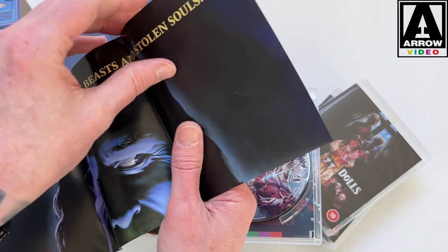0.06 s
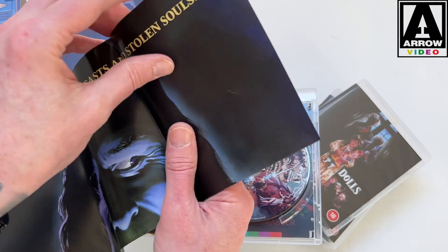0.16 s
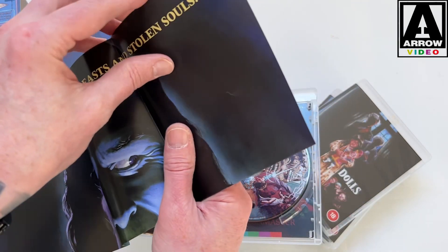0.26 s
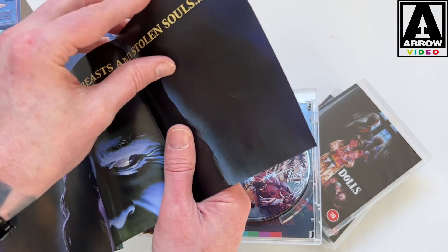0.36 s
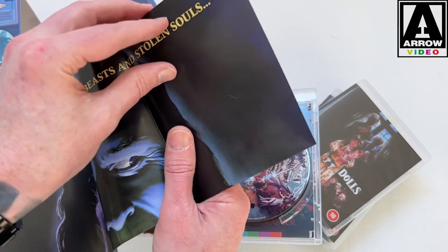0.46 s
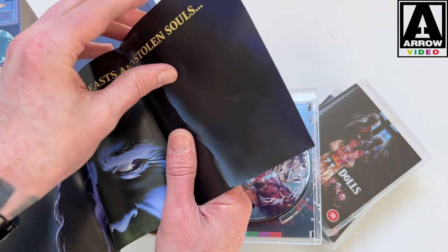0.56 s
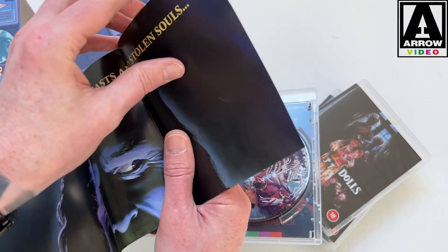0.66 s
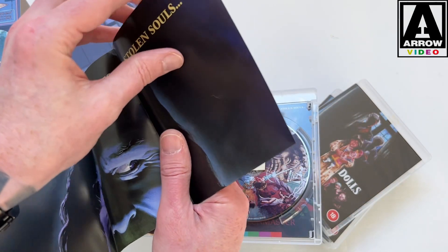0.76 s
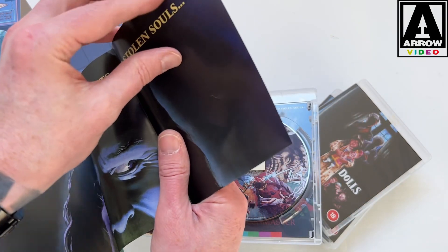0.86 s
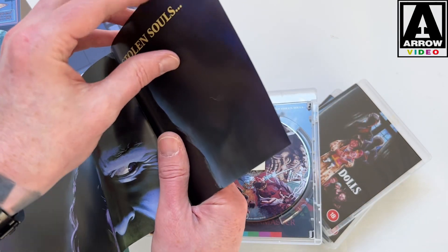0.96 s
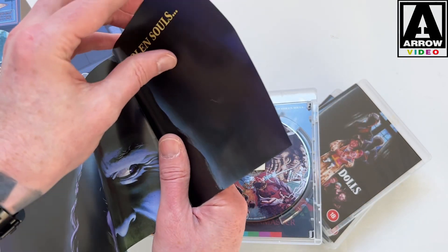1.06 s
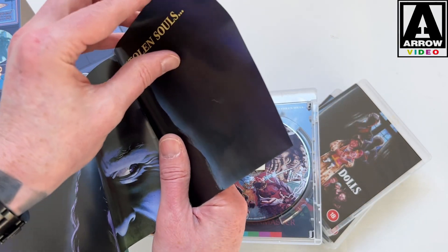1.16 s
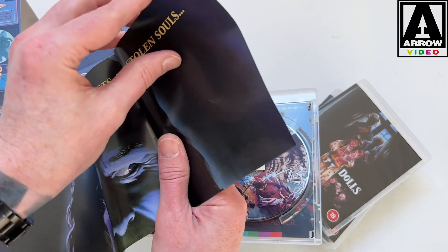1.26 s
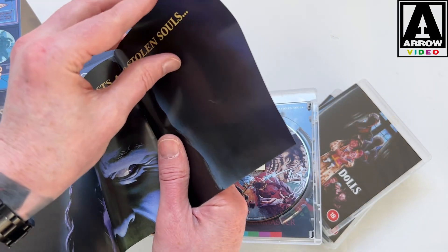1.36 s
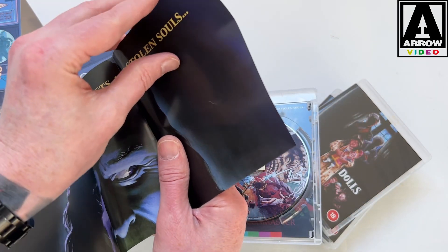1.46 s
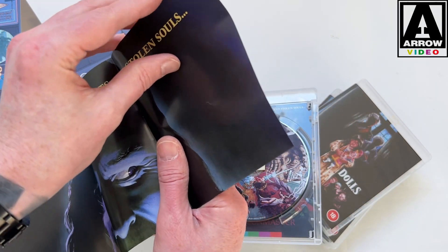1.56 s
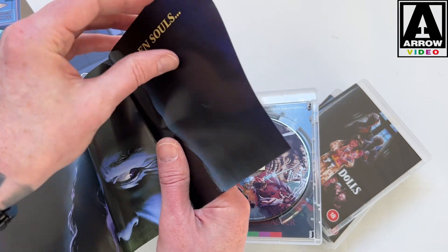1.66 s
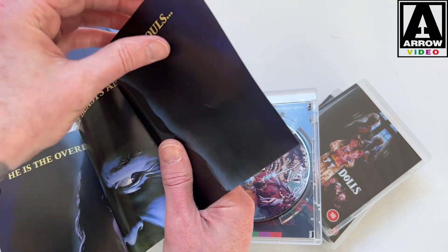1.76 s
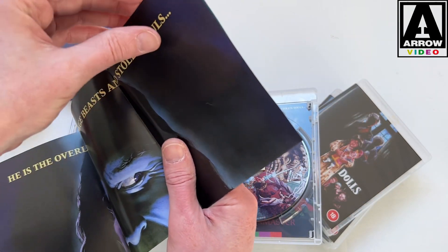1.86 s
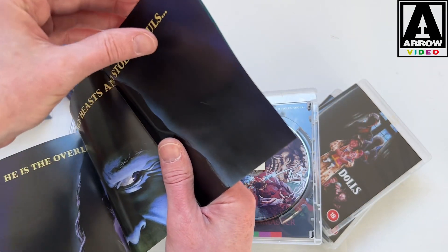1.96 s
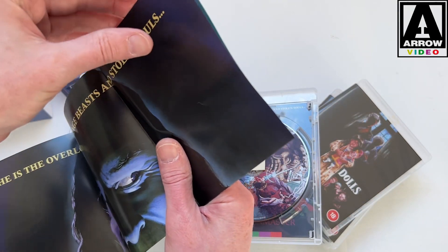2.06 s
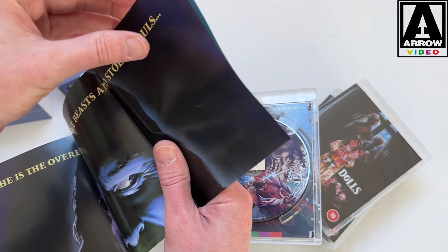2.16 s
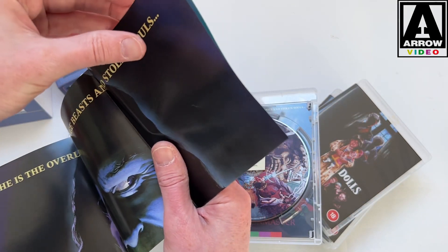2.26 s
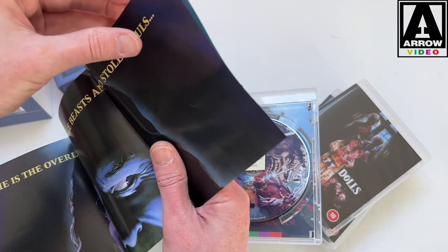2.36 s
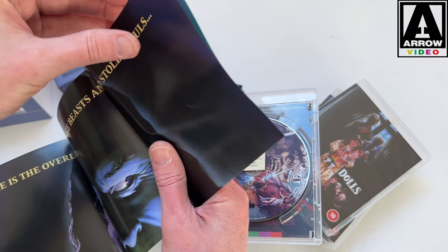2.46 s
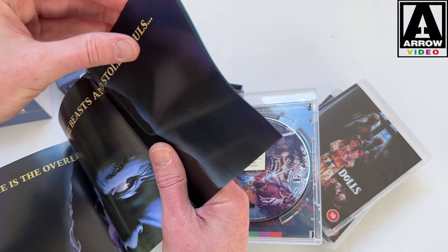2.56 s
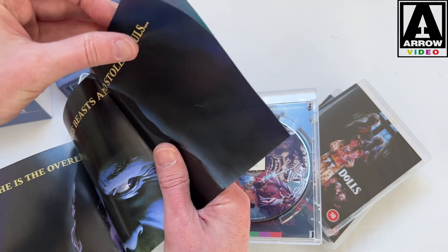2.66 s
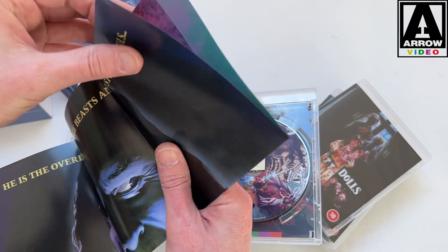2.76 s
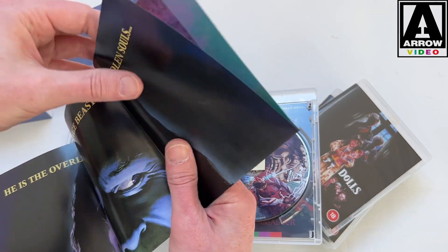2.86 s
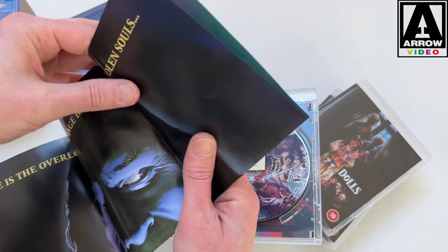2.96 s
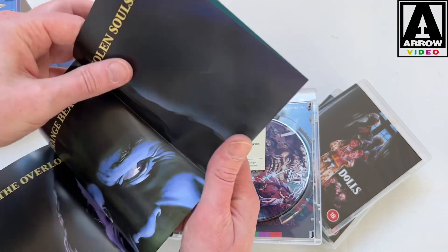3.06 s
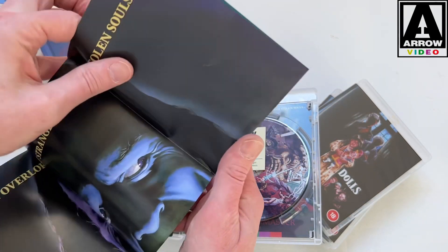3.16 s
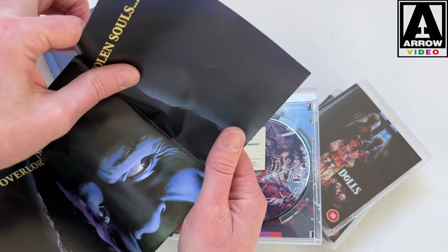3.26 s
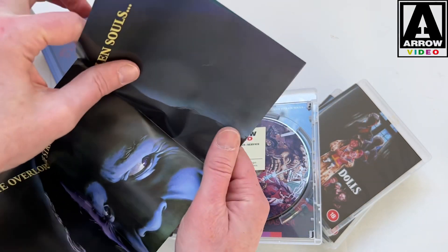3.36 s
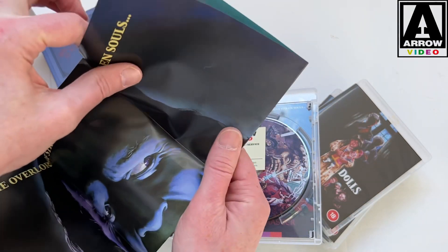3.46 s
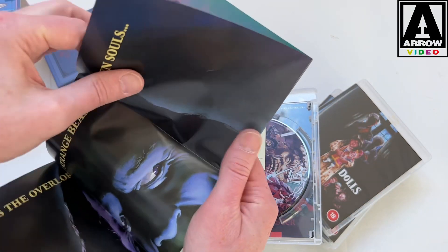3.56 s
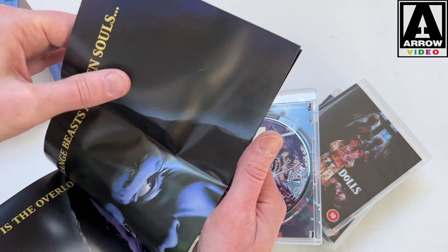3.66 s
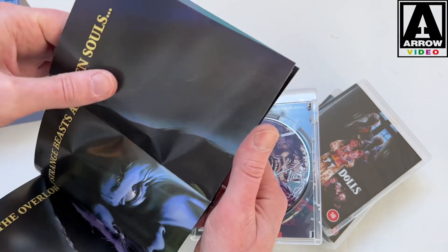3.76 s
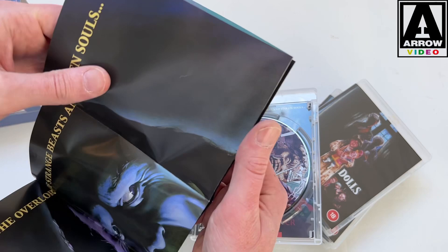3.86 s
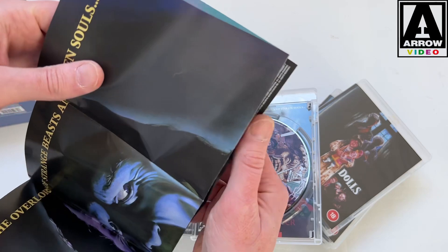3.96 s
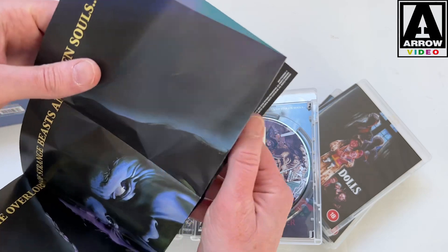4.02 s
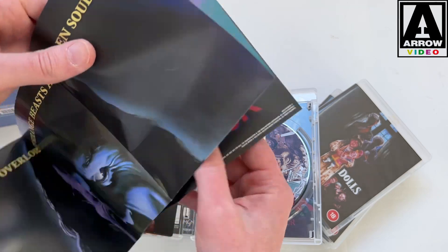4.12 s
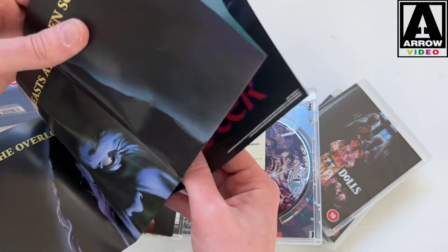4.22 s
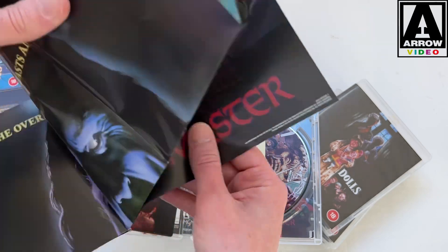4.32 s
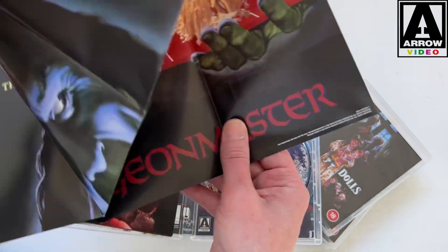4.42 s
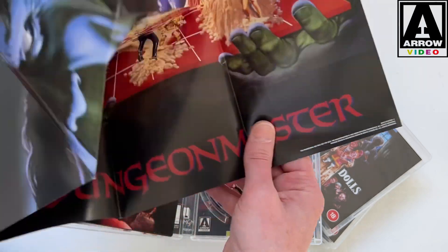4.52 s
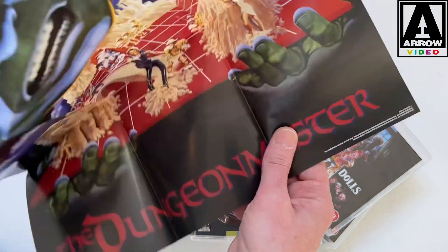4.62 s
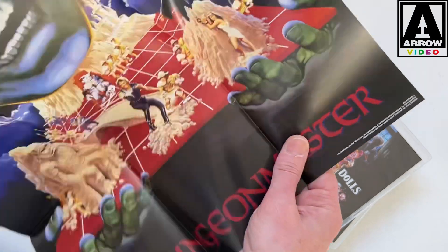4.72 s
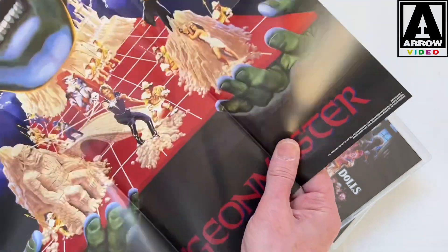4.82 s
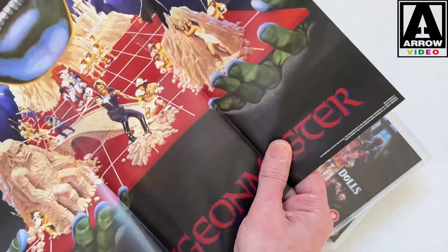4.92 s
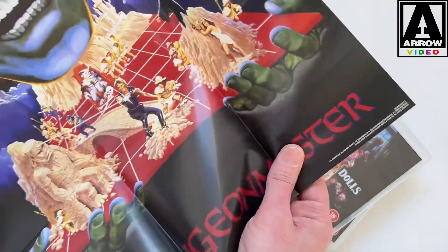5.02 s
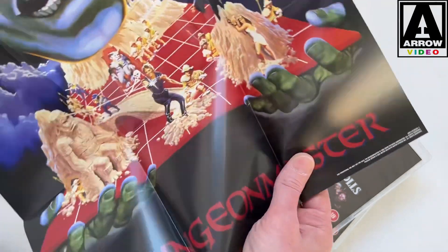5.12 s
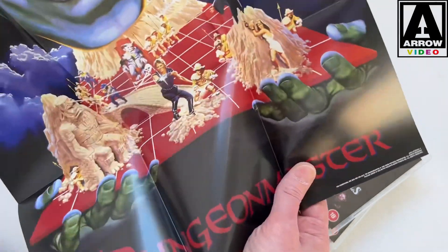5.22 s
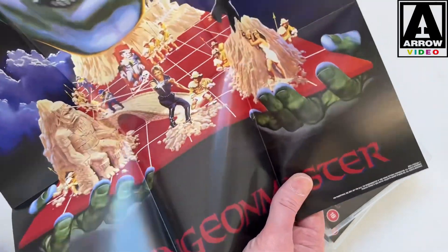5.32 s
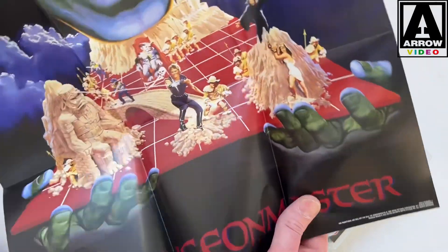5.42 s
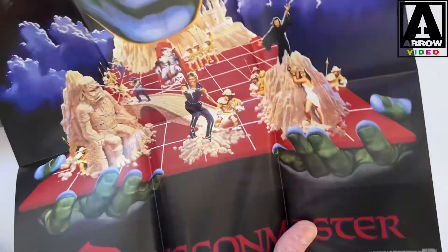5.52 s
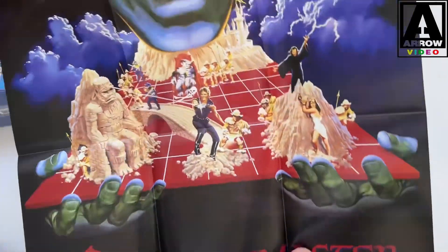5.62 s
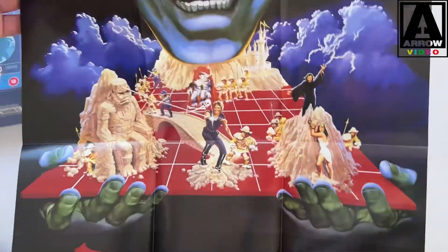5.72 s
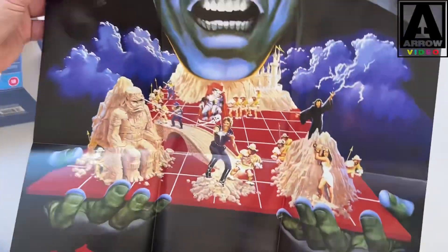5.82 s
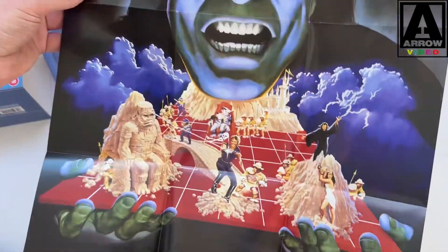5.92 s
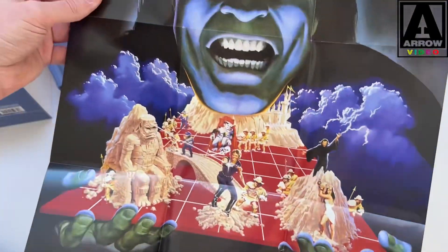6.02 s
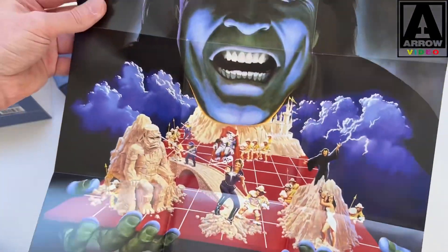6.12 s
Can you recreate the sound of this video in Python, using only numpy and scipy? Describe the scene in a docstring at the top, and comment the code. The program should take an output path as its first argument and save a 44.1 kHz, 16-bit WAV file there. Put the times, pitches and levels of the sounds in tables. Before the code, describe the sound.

Hands unfold a stiff, glossy paper poster close to the microphone in a small, quiet room. Light finger hiss, small crinkles and a few ticks come first, then almost nothing for a moment. Rustling returns and builds to a very sharp burst of snapping creases, followed by dense, loud crackling with low papery wobble and hollow flaps, easing at the end.

```python
"""Unfolding a stiff glossy poster

Hands unfold a poster over a table, close to a two-port microphone. Fingers hiss on the coating (shaped
noise), panels crinkle and the sheet wobbles (resonators driven by noise and small dents), creases snap
(swept damped tones with a thump) and the coating cracks (clicks with short tones). A small room answers
with decaying noise and hums underneath."""
import sys
import numpy as np
from scipy import signal
from scipy.fft import rfft, irfft, next_fast_len
from scipy.io import wavfile
from scipy.ndimage import uniform_filter1d, map_coordinates

SR = 44100
rng = np.random.default_rng(int(sys.argv[2]) if len(sys.argv) > 2 else 0)


def wav_out(sig):
    """Save sig, one row per channel (or a flat mono array), as 16-bit PCM at SR to the path in sys.argv[1]."""
    wavfile.write(sys.argv[1], SR, np.round(np.clip(np.atleast_2d(sig).T, -1, 1) * 32767).astype(np.int16))


N = 272758  # samples


def amp(db):
    """Decibel law: amplitude gain of a level in dB."""
    return 10 ** (np.asarray(db) / 20)


def unit(x):
    """Power normalisation: x at rms 1."""
    return x / np.sqrt(np.mean(x ** 2) + 1e-20)


def along(points, hz):
    """Interpolation of (frequency [Hz], value) points on a logarithmic frequency axis."""
    f, v = np.transpose(points)
    return np.interp(np.log(hz + 1), np.log(f + 1), v)


def curves(rows):
    """Linear interpolation in time: one value per sample for each column after the time."""
    s, *columns = np.transpose(rows)
    return [np.interp(np.arange(N) / SR, s, column) for column in columns]


def wobble(rate):
    """Band-limited random modulation: a smooth curve through `rate` random knots a second."""
    knots = rng.standard_normal(int(N * rate / SR) + 4)
    return map_coordinates(knots, [np.arange(N) * rate / SR])


def filtered(x, response):
    """Linear filtering: the spectrum of x times a complex response of frequency."""
    m = next_fast_len(x.shape[-1] + 8192)  # padding limits wrap-around
    spectrum = rfft(x, m) * response(np.fft.rfftfreq(m, 1 / SR))
    return irfft(spectrum, m)[..., :x.shape[-1]]


def modes(table):
    """Modal superposition: causal response of (centre [Hz], width [Hz], level [dB]) resonances."""
    def response(f):
        total = 0
        for k, (centre, width, db) in enumerate(table):
            damping = 1j * f * width
            total = total + (-1) ** k * amp(db) * damping / (centre ** 2 - f ** 2 + damping)
        return total
    return response


def blurred(x, tail, step):
    """Time-varying convolution: x meets a freshly drawn unit-energy tail every `step` samples."""
    out = np.zeros(N + SR)
    for i in range(0, N, step):
        h = tail()
        answer = signal.fftconvolve(x[i:i + step], h / np.linalg.norm(h))
        out[i:][:len(answer)] += answer
    return out[:N]


# Spectrum of the room's steady air noise: (frequency [Hz], relative density [dB])
AIR_SPECTRUM = [(15, -42), (25, -18), (53, 1), (81, -15.5), (240, -13.5), (366, -21.5), (622, -22),
                (665, -18), (1130, -13), (1210, -16), (2690, -42.5), (5000, -48), (6500, -69),
                (11000, -120)]
AIR_DB = -61.5  # mean level


def hum():
    """Stationary background noise: shaped Gaussian noise whose level drifts a little."""
    air = unit(filtered(rng.standard_normal(N), lambda hz: amp(along(AIR_SPECTRUM, hz))))
    return amp(AIR_DB + 0.38 * wobble(3.0)) * air


def grit(per_s, spread_db, smooth):
    """Asperity contact: random ticks of very uneven size over a share of smooth noise, rms 1."""
    sizes = rng.standard_normal(N) * amp(spread_db * rng.exponential(size=N))
    ticks = (rng.random(N) < per_s / SR) * sizes
    return unit(unit(ticks) + abs(smooth) * rng.standard_normal(N))


def patchy(x, depth_db):
    """Local radiation: random patches of gain over time and frequency, rms 1."""
    z = signal.stft(x, nperseg=256)[2]
    field = uniform_filter1d(rng.standard_normal(z.shape), size=6, axis=0)
    field = uniform_filter1d(field, size=10, axis=1)
    return unit(signal.istft(z * amp(depth_db * unit(field)), nperseg=256)[1][:N])


def buckles(per_s, pitch_hz, cycles, spread_db):
    """Small-scale buckling: many dents, each a damped tone of its own pitch and size, rms 1."""
    place, pitch, size, sign = rng.random((int(per_s * N / SR), 4)).T[:, :, None]
    hz = pitch_hz * np.exp(2.03 * (pitch - .5))
    k = np.arange(400)  # samples in a dent
    turns = hz * k / SR
    level = -60 * turns / (3 * cycles) - spread_db * np.log(size + 0.021)
    dent = np.sin(2 * np.pi * turns) * amp(level) * np.sign(sign - .5)
    where = (place * N).astype(int) + k
    return unit(np.bincount(where.ravel(), dent.ravel(), N + len(k))[:N])


def swells(s, db, hold, rise, fall):
    """Gesture envelope: dB-linear rise [dB/s] up to s, held until s + hold, then dB-linear fall; powers add."""
    t = np.arange(0, N, 32)[:, None] / SR  # a coarse grid, interpolated below
    before = (s - t) * abs(rise)
    after = (t - s - abs(hold)) * abs(fall)
    level = db - np.maximum(np.maximum(before, after), 0)
    return np.interp(np.arange(N) / SR, t[:, 0], np.sqrt(np.sum(amp(level) ** 2, axis=1)))


# Steady handling, base levels: (time [s], finger hiss [dB], crinkle [dB], flexing [dB], hollow boom [dB])
HANDLING_LEVELS = [(0, -57, -51, -63, -64), (.15, -62, -55.5, -64, -68), (.225, -69, -61.5, -65, -70),
                   (.28, -59.5, -53, -63, -68), (.5, -60, -58, -64.5, -67), (.7, -55, -48.5, -57, -72),
                   (.8, -58, -54, -58, -66), (.95, -57.5, -62, -61, -62), (1.09, -71, -67, -60, -67),
                   (1.2, -62, -58, -61, -68), (1.35, -65, -60.5, -64, -71), (1.44, -54, -57.5, -65, -72),
                   (1.49, -73, -71, -78, -79), (1.77, -57, -58, -63, -70), (1.87, -79, -79, -72, -70),
                   (2.37, -83, -74.5, -65.5, -70), (2.53, -83, -92, -74, -72), (2.6, -61, -66, -64, -71),
                   (2.76, -55, -59, -58, -64), (2.9, -45, -48.5, -56, -58), (3.04, -50, -51.5, -57, -55),
                   (3.15, -54.5, -54, -55, -52), (3.25, -65, -56, -56, -58), (3.33, -49, -54, -59.5, -61),
                   (3.44, -57.5, -63, -62.5, -67), (3.58, -48.5, -44, -48, -48),
                   (3.72, -44.5, -41.5, -50, -53), (3.84, -53.5, -49.5, -55, -51.5),
                   (4, -52, -47.5, -58, -55), (4.12, -47, -45, -50, -50.5),
                   (4.25, -43.5, -35.5, -42, -38.5), (4.43, -48, -44, -43.5, -49.5),
                   (4.64, -47, -45, -47, -46), (4.92, -52, -42, -46, -45), (5.12, -45, -41.5, -49, -46.5),
                   (5.2, -47.5, -48, -52, -38), (5.31, -58, -46, -54, -41), (5.4, -48, -30.5, -39, -33),
                   (5.5, -45.5, -38, -47.5, -34.5), (5.57, -46, -44, -50, -46),
                   (5.65, -46.5, -49.5, -52, -53.5), (5.8, -49.5, -48, -52, -51),
                   (5.98, -58, -51.5, -60, -51.5), (6.1, -52, -50.5, -47, -55),
                   (6.18, -54.5, -55, -51, -58)]
# Tugs that make the sheet lurch: (time [s], crinkle level [dB], body level [dB], hold [s])
SHEET_TUGS = [(0.046, -49, -58, 0.013), (0.371, -43, -60, 0.014), (0.834, -48, -51.5, .01),
              (1.128, -54.5, -62, 0.024), (1.22, -56, -56, 0.026), (1.684, -48, -53, 0.023),
              (2.554, -59.5, -67, 0.013), (2.674, -48, -62, 0.021), (2.827, -43, -42, .005),
              (2.942, -38.5, -48.5, .012), (2.974, -38, -46.5, 0.017), (3.134, -44, -50, 0.017),
              (3.216, -59, -48, .005), (3.627, -27.5, -31, 0.021), (3.662, -37, -46, 0.019),
              (3.871, -47.5, -52, .01), (3.895, -40.5, -45.5, .005), (3.937, -42, -59, .01),
              (3.968, -37.5, -58, 0.0071), (4.162, -31, -50, 0.012), (4.376, -36, -37.5, 0.011),
              (4.537, -44, -48, .01), (4.562, -42.5, -46, 0.0065), (4.605, -38, -47, 0.017),
              (4.667, -31, -33, .02), (4.792, -26, -31, 0.024), (4.841, -35.5, -34, 0.012),
              (5.006, -35, -44.5, 0.036), (5.099, -37, -41, .008), (5.27, -39.5, -48, .01),
              (5.336, -31.5, -33, 0.016), (5.599, -45, -55, .015), (5.835, -42.5, -46, .008),
              (5.928, -41, -56, .01), (6.042, -42.5, -40.5, 0.023), (6.091, -50, -42, .01)]
TUG_RISE, TUG_FALL = 1300, 424  # dB/s
# Finger strokes on the coating: (time [s], level [dB], hold [s], rise [dB/s])
FINGER_STROKES = [(0.036, -47, 0.022, 298), (0.123, -56.5, .07, 300), (0.253, -54.5, .01, 1200),
                  (0.382, -50.5, .03, 600), (.585, -49, 0.21, 250), (0.833, -41, .008, 800),
                  (1.133, -49.5, 0.024, 700), (1.3, -54, .01, 300), (1.367, -47.5, .015, 1200),
                  (1.413, -49.5, 0.019, 400), (1.66, -61, .01, 400), (1.701, -42, 0.0082, 500),
                  (2.03, -72, .01, 400), (2.145, -77, .01, 400), (2.302, -71, .005, 1500),
                  (2.553, -48.5, .005, 2500), (2.567, -46, 0.0034, 604), (2.686, -40, 0.011, 400),
                  (2.8, -44, .01, 900), (2.829, -36, .008, 400), (2.87, -39.5, 0.058, 400),
                  (2.95, -44.5, 0.049, 400), (3.197, -48.5, 0.018, 200), (3.278, -45.5, 0.024, 700),
                  (3.33, -42, 0.0091, 300), (3.471, -51, .01, 600), (3.507, -45.5, 0.012, 300),
                  (3.644, -40.5, 0.026, 600), (3.868, -45, .01, 600), (3.891, -37.5, 0.0071, 400),
                  (3.958, -42.5, 0.016, 500), (4.059, -39.5, .01, 300), (4.148, -42, 0.15, 1500),
                  (4.332, -38.5, 0.056, 900), (4.475, -36, 0.023, 500), (4.675, -46, 0.017, 900),
                  (4.793, -35.5, 0.033, 2000), (4.956, -41, 0.049, 700), (5.003, -34, 0.032, 600),
                  (5.102, -35.5, .01, 300), (5.227, -41.5, 0.009, 300), (5.339, -42.5, .11, 1500),
                  (5.995, -45.5, .02, 2500), (6.035, -44.5, .035, 600)]
STROKE_FALL = 350  # dB/s
BOOM_DB, FAN_DB = -2, -8  # boom and fanned air of a tug, relative to its body
DRAUGHT_DB, STIR_DB = -5, -67.5  # fanned air relative to flexing; base level of air always stirring


def efforts():
    """Energetic summation: steady handling plus strokes and tugs drive five kinds of sound."""
    hiss, crinkle, flex, boom = amp(curves(HANDLING_LEVELS))
    s, crinkle_db, body_db, hold = np.transpose(SHEET_TUGS)
    tug_body = swells(s, body_db, hold, TUG_RISE, TUG_FALL)
    tug_crinkle = swells(s, crinkle_db, hold, TUG_RISE, TUG_FALL)
    strokes = swells(*np.transpose(FINGER_STROKES), STROKE_FALL)
    fanned = np.hypot(amp(DRAUGHT_DB) * flex, amp(FAN_DB) * tug_body)
    return (np.hypot(hiss, strokes),
            np.hypot(crinkle, tug_crinkle),
            np.hypot(flex, tug_body),
            np.hypot(boom, amp(BOOM_DB) * tug_body),
            amp(STIR_DB) + fanned)


# Friction spectrum of the coating: (frequency [Hz], relative level [dB])
COATING_SPECTRUM = [(300, -46), (1000, -24), (2000, -3.5), (3500, -5), (5000, -1.5), (6500, -2),
                    (9000, -8.5), (11000, -9), (12000, -20.5)]
# Resonances of the folded panels: (centre [Hz], width [Hz], relative level [dB])
PANEL_MODES = [(515, 220, -8), (907, 145, 3.5), (1396, 170, -0.5), (2140, 960, -6), (3120, 790, -6.5)]
# Bending resonances of the whole sheet: (centre [Hz], width [Hz], relative level [dB])
SHEET_MODES = [(116, 47, -1.5), (220, 104, -4.5)]
# Resonances of air between sheet and table: (centre [Hz], width [Hz], relative level [dB])
HOLLOW_MODES = [(316.6, 53, 1.5), (391, 64, -3)]
# Spectrum of air fanned at the microphone: (frequency [Hz], relative level [dB])
PUSH_SPECTRUM = [(20, -24), (35, -12), (55, 15), (80, 10), (120, -5), (200, -44)]


def handling():
    """Forced vibration: friction hisses, buckling rings panels, the sheet flexes, booms and fans air."""
    hissing, crinkling, flexing, booming, fanning = efforts()
    jerk = wobble(30)  # the hands never move evenly
    rubbing = grit(2500, spread_db=0.9, smooth=1.65)
    slide = patchy(filtered(rubbing, lambda hz: amp(along(COATING_SPECTRUM, hz))), depth_db=2.5)
    rustle = patchy(filtered(grit(700, spread_db=1.9, smooth=1.2), modes(PANEL_MODES)), depth_db=3.5)
    dents = amp(3.2 * wobble(45)) * buckles(600, pitch_hz=1260, cycles=1.82, spread_db=3.5)
    crinkle = unit(0.75 * rustle + 0.7 * dents)
    flex = unit(filtered(rng.standard_normal(N), modes(SHEET_MODES)))
    boom = unit(filtered(rng.standard_normal(N), modes(HOLLOW_MODES)))
    push = unit(filtered(rng.standard_normal(N), lambda hz: amp(along(PUSH_SPECTRUM, hz))))
    return (hissing * amp(1.0 + 1.1 * jerk) * slide
            + crinkling * amp(0.88 + 0.92 * jerk + 1.3 * wobble(70)) * crinkle
            + flexing * amp(2.4 * wobble(25)) * flex
            + booming * amp(1.75 * wobble(14)) * boom
            + fanning * amp(3.0 * wobble(14)) * push)


SMALL_DB, SMALL_HZ = 8.5, 1200  # mean level over the crinkle; typical nominal pitch


def small_snaps(count):
    """Random point process: lesser creases, their strength following the crinkling around them."""
    place, strength, pitch, thump = rng.random((count, 4)).T
    s = place * (N - 1) / SR
    crinkle = efforts()[1]
    db = 20 * np.log10(crinkle[(s * SR).astype(int)]) + SMALL_DB + 8 * (strength - .5)
    return list(zip(s, db, SMALL_HZ * np.exp(1.61 * (pitch - .5)), -25 * thump))


# Creases snapping, before common trims:
# (time [s], level [dB], nominal panel pitch [Hz], thump relative to the snap [dB])
CREASE_SNAPS = [(.248, -33.5, 1690, -20), (.336, -19, 2070, -24), (.337, -22, 800, -22),
                (.369, -20, 890, -25), (.372, -17, 2100, -25), (.375, -17, 1500, -23),
                (.379, -21, 1900, -25), (.383, -17.5, 1520, -21), (.821, -29, 1530, -28),
                (.833, -23, 1570, -13.5), (.842, -28, 1090, -17), (1.0174, -28, 730, -1.5),
                (1.2225, -15.5, 700, -14), (1.363, -36, 1580, -16), (1.652, -36, 1030, -19),
                (1.676, -34, 2200, -25), (1.688, -25, 2000, -26), (1.699, -23, 1890, -18),
                (1.709, -23.5, 1840, -14), (1.734, -34.5, 603, -8), (2.302, -41, 1480, -12),
                (2.668, -35, 4240, -24), (2.728, -41, 895, -20), (2.793, -31, 795, -24),
                (2.829, -20.5, 945, -7), (2.945, -24, 1520, -22), (2.955, -24, 2340, -21),
                (2.977, -22.5, 905, -8), (2.999, -25, 680, -12), (3.016, -29, 620, -10),
                (3.061, -23, 900, -20), (3.0804, -12.5, 760, -16), (3.133, -26, 824, -4),
                (3.151, -22.5, 796, -13), (3.179, -28.5, 606, -6), (3.219, -29.5, 580, 0.5),
                (3.394, -37, 700, -20), (3.534, -21.5, 725, -22), (3.564, -21, 1310, -9.5),
                (3.598, -23, 400, -10), (3.606, -26, 450, -12), (3.607, -27, 2100, -25),
                (3.618, -5.5, 1860, -15), (3.623, -1, 2190, -30), (3.627, 2.5, 2100, -22),
                (3.634, -1.5, 2590, -27), (3.632, 1.5, 760, -25), (3.644, -18, 392, -2),
                (3.655, -16, 1500, -15), (3.663, -19, 1000, -10), (3.761, -17, 3660, -12),
                (3.87, -22, 2360, -23), (3.894, -20, 1340, -18), (3.945, -23, 1520, -24),
                (3.97, -20, 1600, -26), (4.054, -19, 2380, -24), (4.094, -29, 1210, -20),
                (4.123, -27, 1500, -20), (4.154, -10, 1050, -25), (4.16, -15, 1700, -25),
                (4.169, -2, 1590, -23), (4.174, -12, 1300, -20), (4.196, -16, 1910, -29),
                (4.316, -20, 2300, -25), (4.332, -20, 1300, -20), (4.337, -14, 1130, -29),
                (4.379, -12.5, 1100, -5), (4.391, -13.5, 820, -29), (4.443, -26, 450, -6),
                (4.546, -20.5, 844, -4.5), (4.567, -22.5, 564, -7), (4.605, -25, 1300, -16),
                (4.617, -15.5, 1110, -16), (4.667, -13, 1970, -13), (4.674, -17, 1200, -21),
                (4.684, -20, 870, -3), (4.734, -10.5, 755, -27), (4.755, -19, 1150, -2),
                (4.768, -23, 900, -14), (4.789, -7, 1260, -15), (4.796, -6.5, 1220, -21),
                (4.802, -5.5, 1810, -17), (4.814, -12.5, 470, -17), (4.825, -12, 850, -3),
                (5.004, -18, 560, -30), (5.027, -20, 1000, -17), (5.235, -17.5, 1016, -24),
                (5.27, -18, 1030, -9), (5.308, -26, 800, -10), (5.338, -12.5, 1960, -3),
                (5.344, -11, 406, -4.5), (5.353, -12, 830, -7), (5.385, -18, 700, -8),
                (5.405, -16, 900, -6), (5.452, -17.5, 800, -10), (5.437, -14, 1520, -22),
                (5.486, -21, 401, -15), (5.613, -29, 905, -12), (5.836, -27, 1260, -11),
                (5.921, -13, 618, -29), (5.995, -29, 1800, -13), (6.002, -21.5, 1110, -3),
                (6.033, -27, 470, -9)]
# t60 of the ring: base [s], minus this per dB of level [s/dB], plus cycles of the nominal pitch
RING_S, RING_S_PER_DB, RING_CYCLES = 0.0092, .00025, 10.5
TICK_DB, TICK_DB_PER_OCTAVE = -10.5, 8.5  # tick at 1500 Hz; high, tight panels tick brighter


def snaps():
    """Dispersive bending waves: a falling tone in a burst of rustle and ticks, with a modal thump."""
    out, t = np.zeros(N + SR), np.arange(SR // 10) / SR
    blow = filtered(np.exp(-t / 0.00067), modes(SHEET_MODES + HOLLOW_MODES))
    blow = blow / np.max(abs(blow))
    for s, db, hz, thump_db in CREASE_SNAPS + small_snaps(count=110):
        rustle_noise, tick_noise = rng.standard_normal((2, len(t)))
        t60 = np.clip(RING_S - RING_S_PER_DB * db + RING_CYCLES / hz, .003, .3)
        fade = amp(-60 * t / t60) * (1 - np.exp(-t / 0.00097))
        turns = 0.95 * hz * t + 0.9 * (1 - np.exp(-t / .0013))  # short bending waves arrive first
        ring = np.sin(2 * np.pi * turns)
        panel_mode = modes([(hz, 1.1 * hz, 0)])
        rustle = unit(filtered(rustle_noise, lambda f: panel_mode(f) / (1 + 1j * f / (2.66 * hz)) ** 2))
        panel = 0.45 * rustle + 0.88 * ring
        tick = unit(filtered(tick_noise, lambda f: amp(along(COATING_SPECTRUM, f))))
        tick_gain = amp(TICK_DB + TICK_DB_PER_OCTAVE * np.log2(hz / 1500))
        thump = rng.choice([-1, 1]) * blow * amp(-60 * t / 0.094)
        snap = (panel + tick_gain * tick) * fade + amp(thump_db + 3.5) * thump
        out[round(s * SR):][:len(t)] += amp(db - 5.5) * snap
    return out[:N]


# Hard cracks of the coating along a fold, before a common trim: (time [s], level [dB], nominal pitch [Hz])
COATING_CRACKS = [(.3374, -24, 2190), (.369, -20, 4900), (.374, -24, 5200), (0.383, -22, 2260),
                  (0.833, -25, 5150), (1.582, -42.5, 9550), (1.6985, -27, 3830), (2.6368, -30, 5750),
                  (2.8287, -32, 4530), (3.0595, -34, 3440), (3.0801, -12.5, 3300), (3.0812, -21, 6430),
                  (3.594, -24.5, 6100), (3.6175, -16, 3500), (3.6231, -6, 2840), (3.628, -8, 4200),
                  (3.632, -5, 3000), (3.6352, -8.5, 3000), (3.7606, -18.5, 3030), (3.8962, -21, 3730),
                  (3.937, -24.5, 2760), (4.047, -23.5, 3330), (4.1536, -15.5, 3430), (4.1703, -9.5, 2310),
                  (4.1966, -18, 2060), (4.3375, -11, 2300), (4.3378, -11, 4100), (4.3797, -17, 3180),
                  (4.6167, -28, 2370), (4.6664, -13.5, 2890), (4.7895, -16, 1980), (4.8063, -9, 1960),
                  (5.0063, -26, 3460), (5.237, -24.5, 2800), (5.3395, -18, 3140), (5.346, -22, 5000),
                  (5.37, -5, 6930), (5.3703, -13, 4200), (5.4124, -19.5, 2620), (5.4355, -19.5, 2040),
                  (5.9225, -22, 1580), (6.0356, -30, 5430)]
CRACK_S, CRACK_CYCLES = 0.002, 6  # t60 of the tone: base [s] plus cycles of its nominal pitch
CLICK_S, CLICK_DB = .005, -4  # t60 [s]; level relative to the tone's gain [dB]


def cracks():
    """Impulsive fracture and reflection: a dry click and sagging tone, returned once by the table."""
    out, t = np.zeros(N + SR), np.arange(SR // 40) / SR
    for s, db, hz in COATING_CRACKS:
        t60 = np.clip(CRACK_S + CRACK_CYCLES / hz, .001, .03)
        turns = hz * (0.9 * t + 0.35 * 0.0007 * (1 - np.exp(-t / 0.0007)))
        body = amp(-60 * t / t60) * np.sin(2 * np.pi * turns)

        def band(f):
            return 1j * f / (0.3 * hz + 1j * f) / (1 + 1j * f / (1.3 * hz)) ** 2

        noise = unit(filtered(rng.standard_normal(len(t)), band))
        click = amp(CLICK_DB - 60 * t / CLICK_S) * noise
        onset = 1 - np.exp(-t / 0.0003)
        out[round(s * SR):][:len(t)] += amp(db + 5.5) * onset * (body + click)
    reflection = np.pad(out, (60, 0))[:N]  # 60 samples late
    return out[:N] + amp(-9) * reflection


# Reverberation time of the room: (frequency [Hz], t60 [s])
ROOM_T60 = [(100, 0.25), (1000, 0.19), (4000, 0.26), (10000, 0.038)]


def room(x):
    """Frequency-dependent reverberation: noise tails, redrawn every quarter second."""
    def tail():
        hz, t, z = signal.stft(rng.standard_normal(SR // 2), SR, nperseg=256)
        decay = amp(-60 * t / along(ROOM_T60, hz)[:, None])
        return signal.istft(z * decay, SR, nperseg=256)[1]
    return blurred(np.pad(x, (200, 0))[:N], tail, SR // 4)  # 200 samples of travel


# Phase between the ports: (frequency [Hz], lead of left over right [rad])
PORT_LEAD = [(30, 0), (200, -.1), (520, -.6), (800, -.2), (1900, 0), (2400, 1.6), (2800, 2.3), (3500, 2),
             (3900, .9), (4400, 1.7), (5000, 1.2), (5600, np.pi), (6700, np.pi), (7300, 2 * np.pi),
             (8850, 2 * np.pi), (9500, 3 * np.pi), (11200, 3 * np.pi), (11600, 4 * np.pi)]
# Level between the ports: (frequency [Hz], left minus right [dB])
PORT_LEVEL = [(60, 0), (400, -.5), (700, -2), (1100, 0), (1900, 0), (2900, -2.5), (5000, -1.5), (6000, 0)]


def ports(x, alike):
    """Interchannel coherence: a shared part with a phase lead, a scattered part opposed left to right."""
    t = np.arange(SR // 100) / SR

    def scatter():
        return rng.standard_normal(len(t)) * amp(-60 * t / 0.013)

    def shares(hz):
        turn = np.arccos(np.clip(along(alike, hz), 0, 1)) / 2
        return np.array([np.cos(turn), np.sin(turn)])

    def sides(hz):
        half = amp(along(PORT_LEVEL, hz) / 2) * np.exp(.5j * along(PORT_LEAD, hz))
        return np.array([half, 1 / half])

    scattered = blurred(x, scatter, SR // 50)
    same, apart = filtered(np.array([x, scattered]), shares)
    return filtered(np.array([same + apart, same - apart]), sides)


# Likeness of the ports for the paper and its room: (frequency [Hz], coherence [0-1])
PAPER_COHERENCE = [(100, .999), (200, .99), (350, .9), (700, .84), (1200, .92), (1900, .96), (2400, .7),
                   (3500, .55), (4800, .55), (5800, .998), (6500, .99), (7000, .6), (7500, .998),
                   (8700, .998), (9150, .5), (9700, .998), (11000, .99), (11600, .9)]
# Likeness of the ports for the hum: (frequency [Hz], coherence [0-1])
AIR_COHERENCE = [(60, .995), (200, .7), (600, .6), (1900, .85), (3000, .4)]


def scene():
    """Superposition: paper with its room, and the hum, at both ports."""
    soft, hard = snaps(), cracks()
    answer = room(amp(-14) * soft + amp(-18) * hard)
    paper = handling() + soft + hard + answer
    return ports(paper, PAPER_COHERENCE) + ports(hum(), AIR_COHERENCE)


# Treble shaping: (frequency [Hz], gain [dB]); a deep narrow notch near 11.9 kHz, thin tones just above
TREBLE_SHAPE = [(9300, 0), (10500, -5), (11500, 0.5), (11900, -43), (12300, -19)]
TOP_HZ = 12800  # band limit


def record(dry):
    """Saturation and band limiting: loud peaks are rounded, then the treble is shaped and cut off."""
    rounded = dry / (1 + abs(dry / .9) ** 4) ** (1 / 4)
    return filtered(rounded, lambda hz: amp(along(TREBLE_SHAPE, hz)) * (hz < TOP_HZ))


dry = scene()
out = record(dry)
wav_out(out)
```